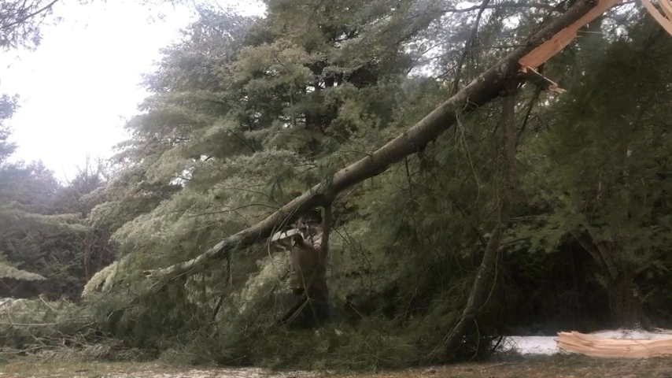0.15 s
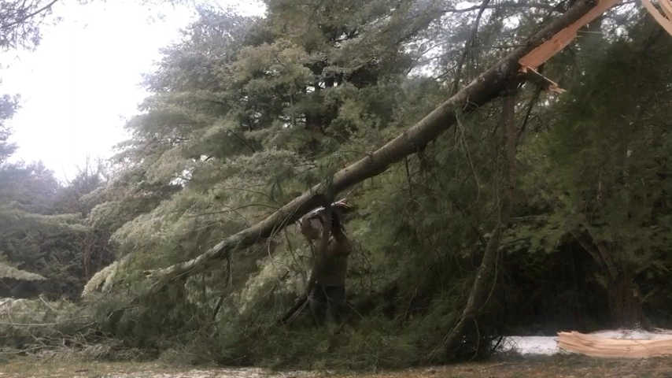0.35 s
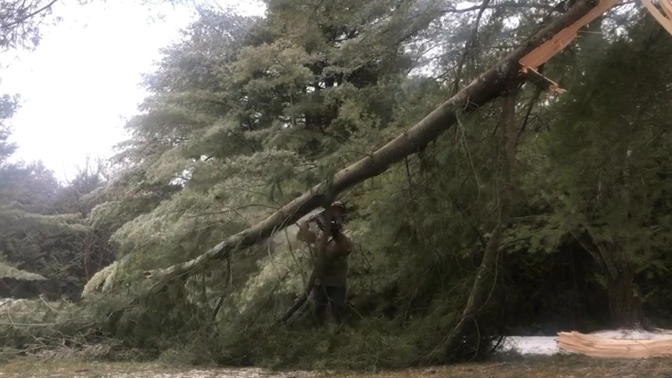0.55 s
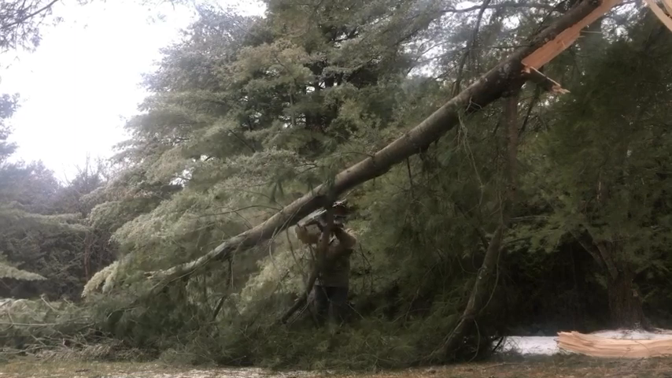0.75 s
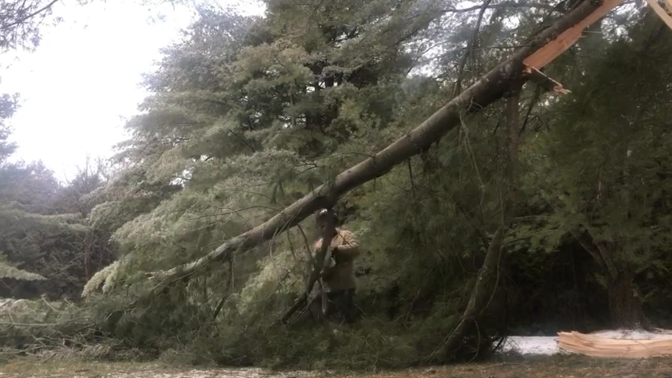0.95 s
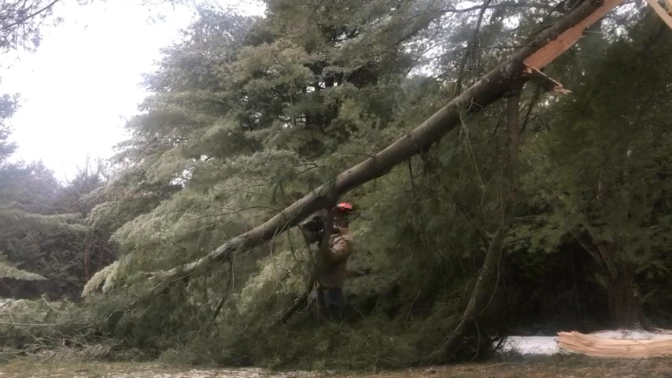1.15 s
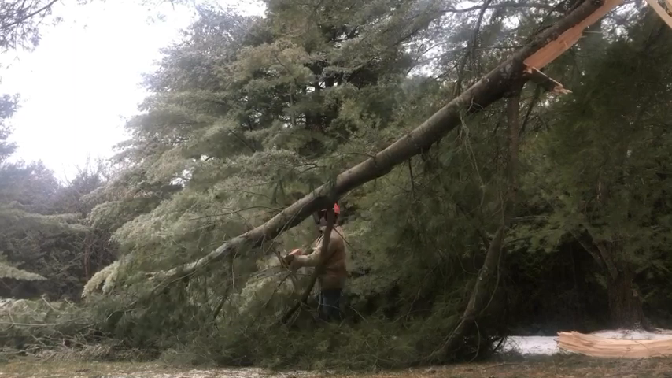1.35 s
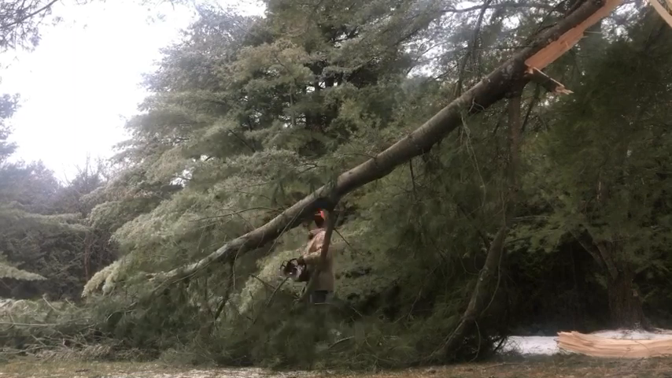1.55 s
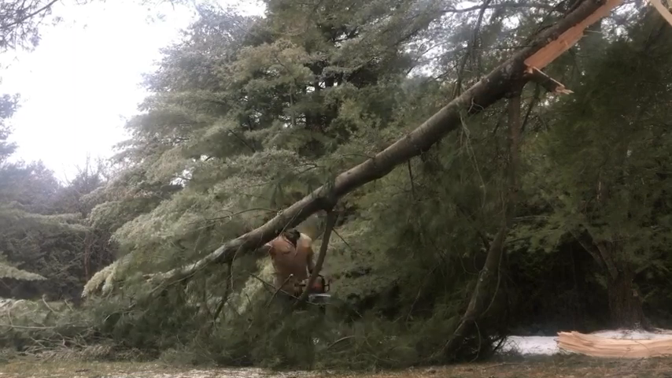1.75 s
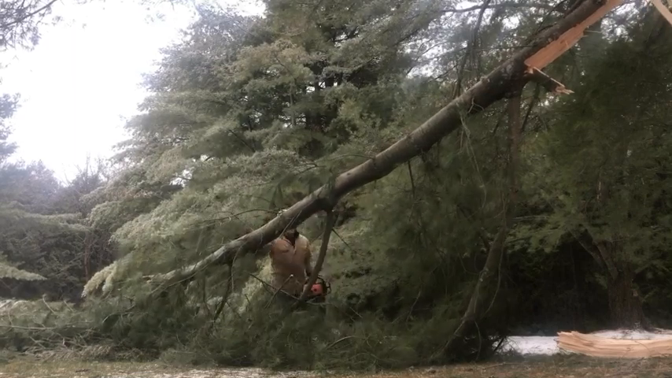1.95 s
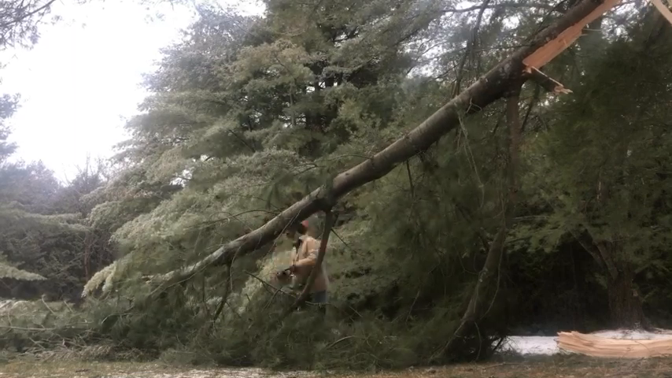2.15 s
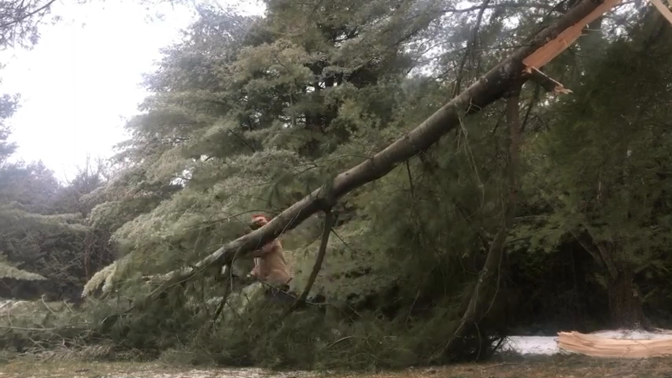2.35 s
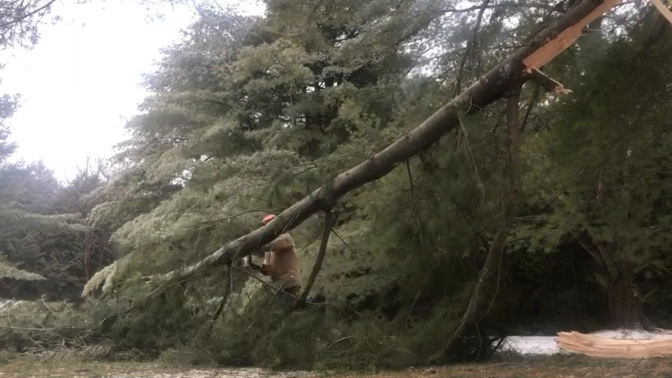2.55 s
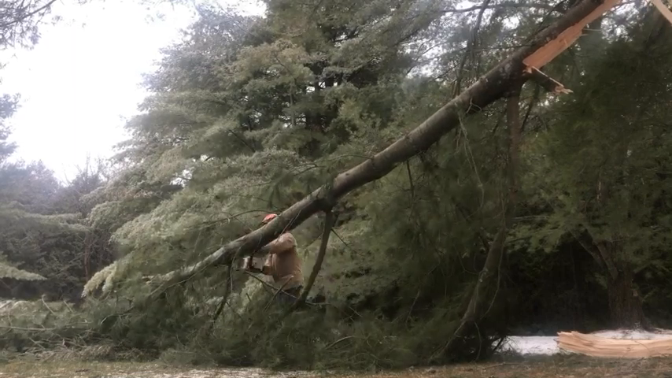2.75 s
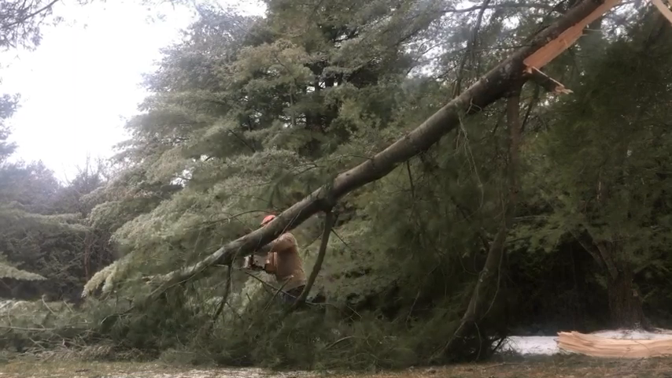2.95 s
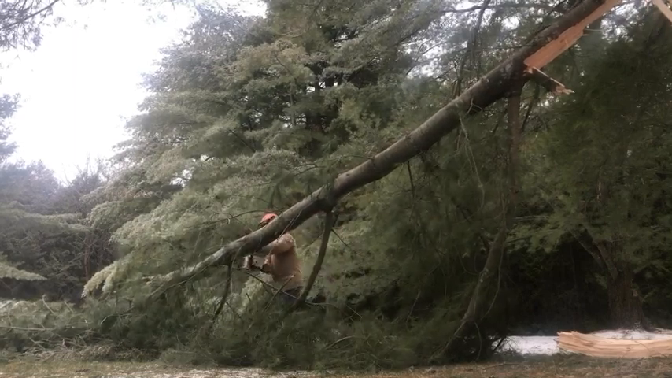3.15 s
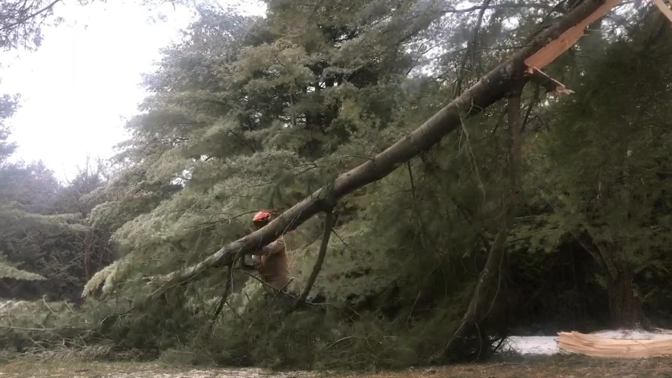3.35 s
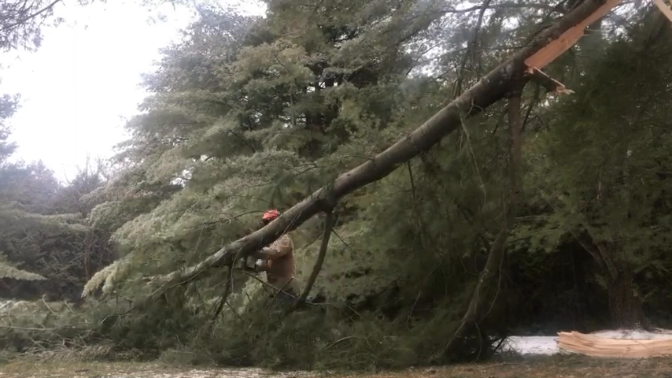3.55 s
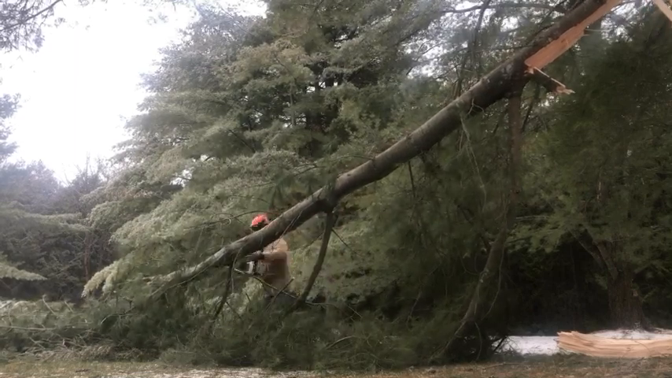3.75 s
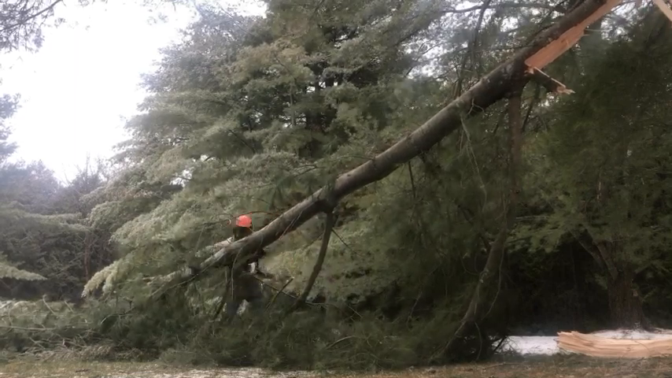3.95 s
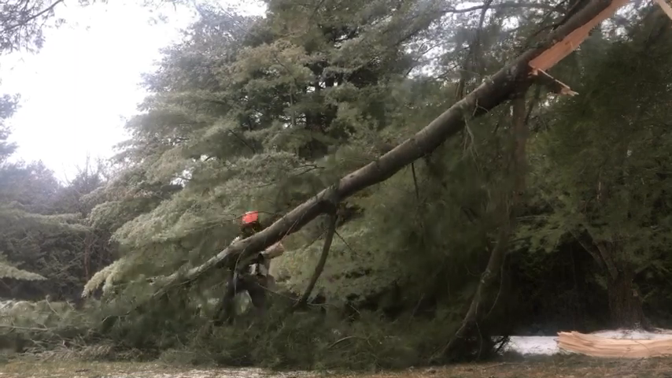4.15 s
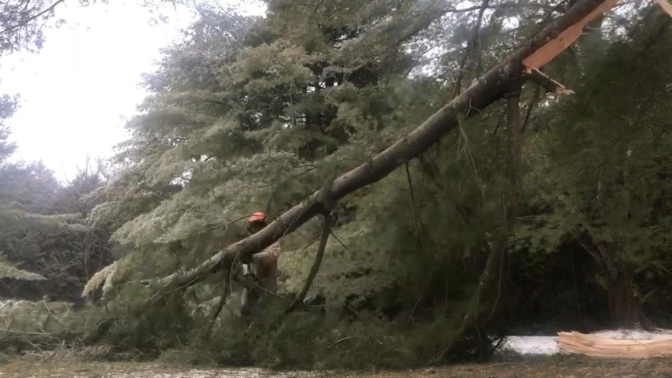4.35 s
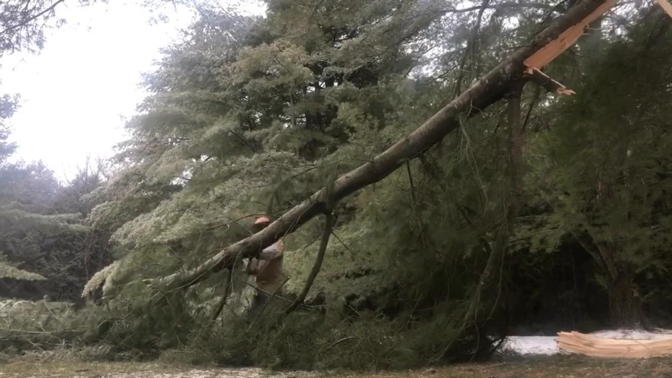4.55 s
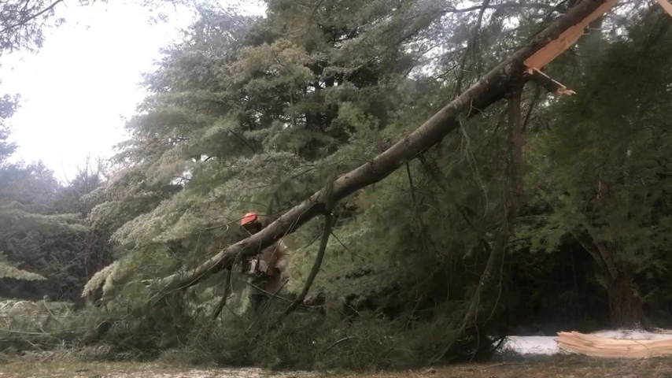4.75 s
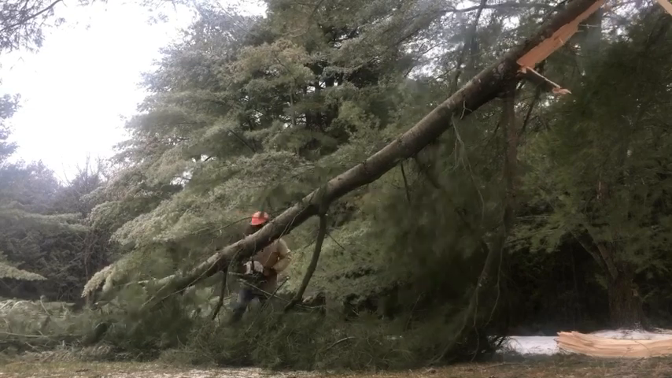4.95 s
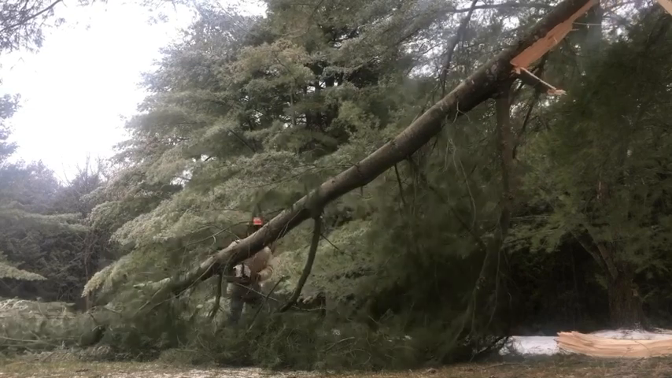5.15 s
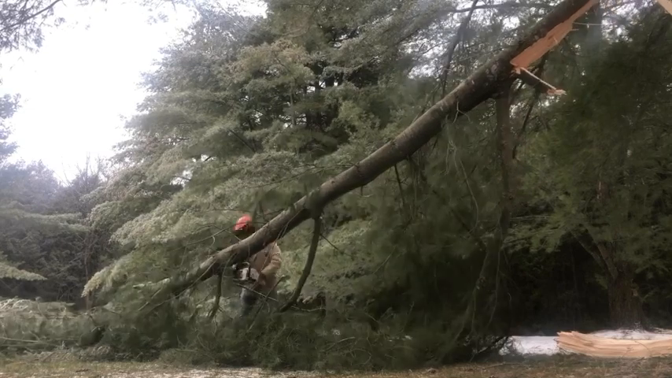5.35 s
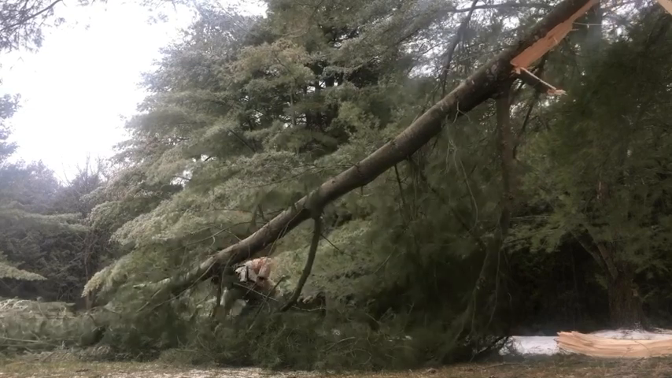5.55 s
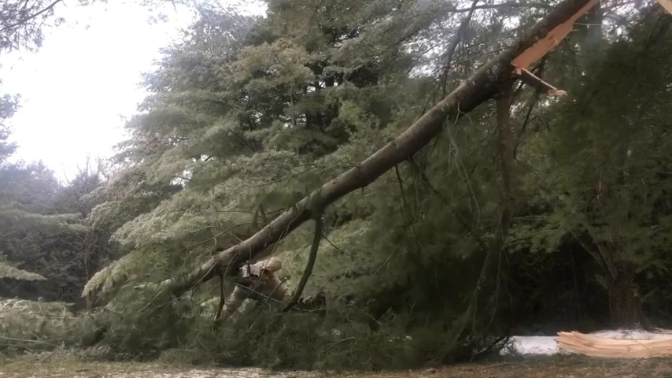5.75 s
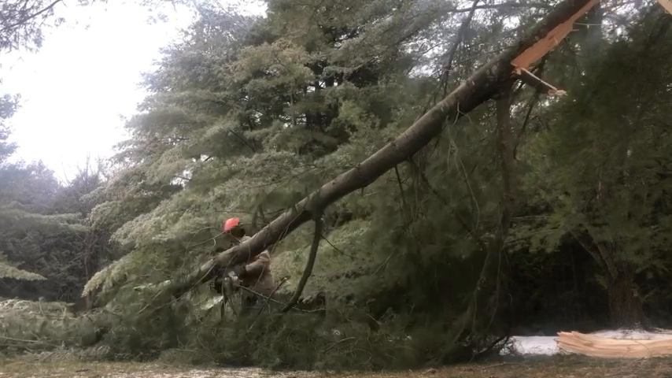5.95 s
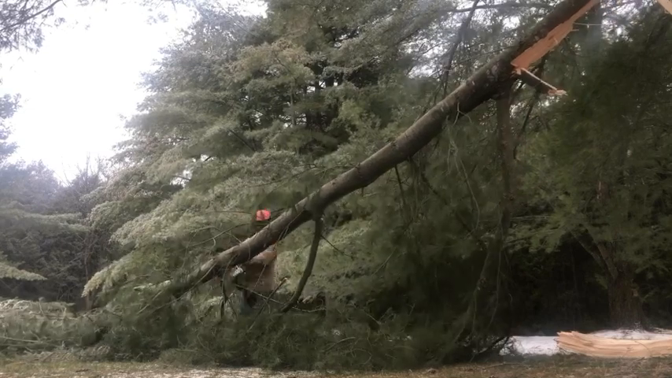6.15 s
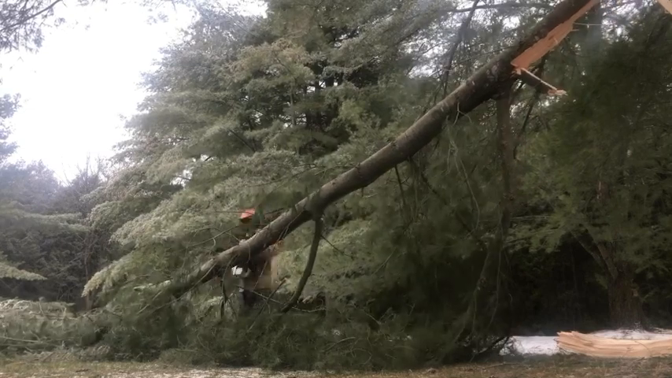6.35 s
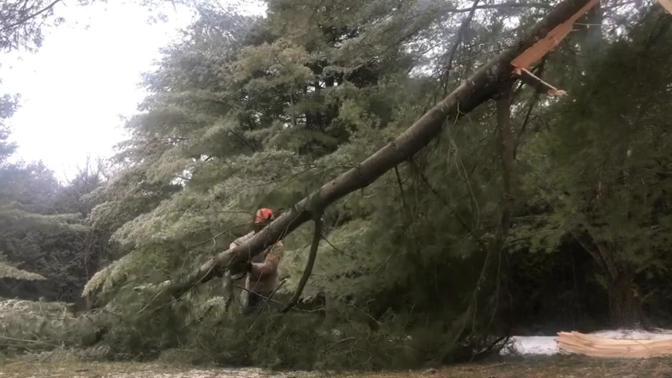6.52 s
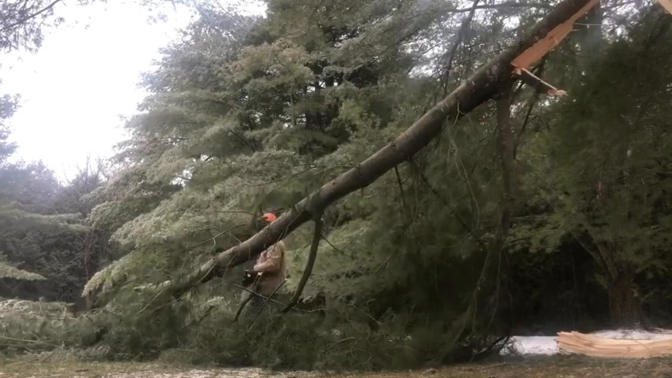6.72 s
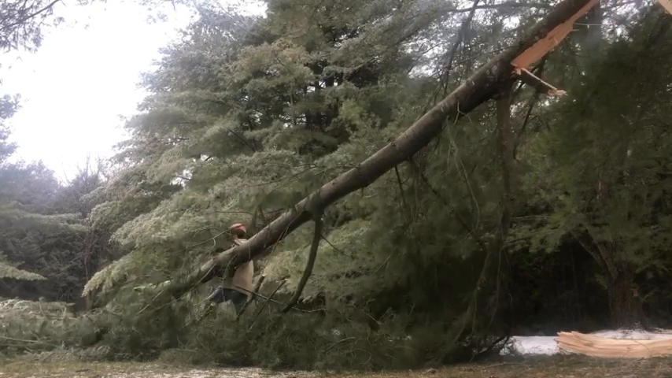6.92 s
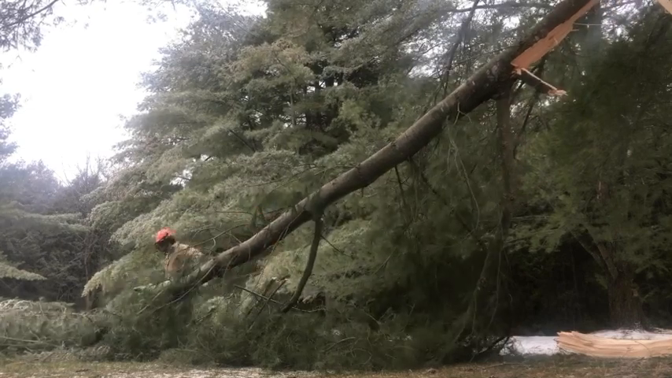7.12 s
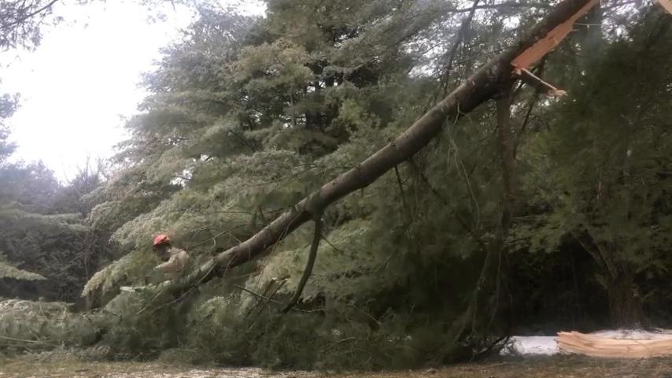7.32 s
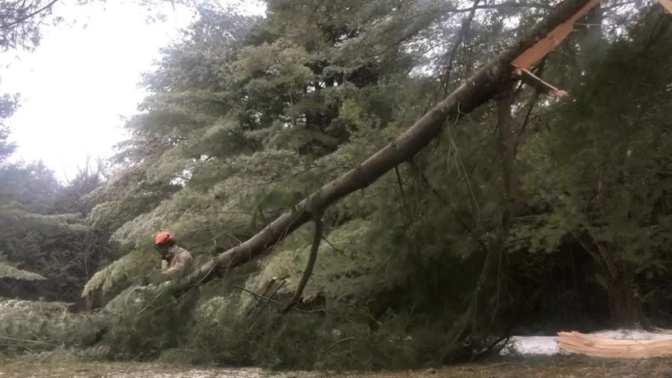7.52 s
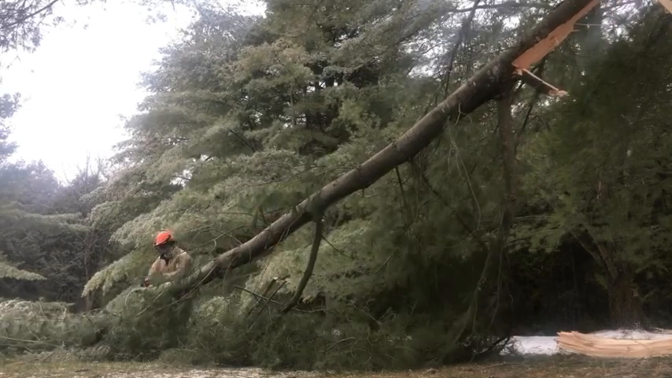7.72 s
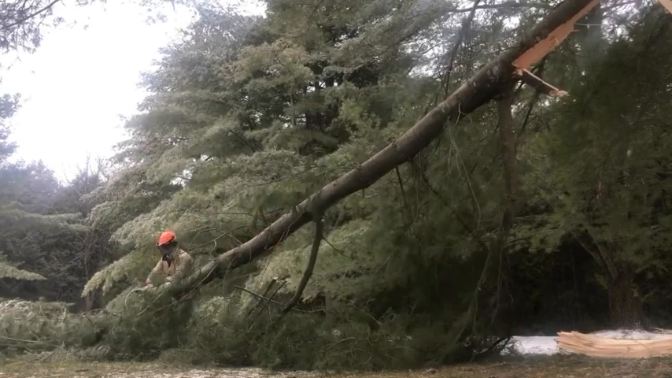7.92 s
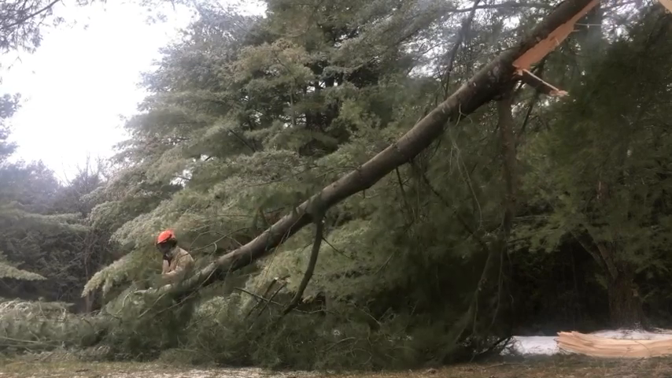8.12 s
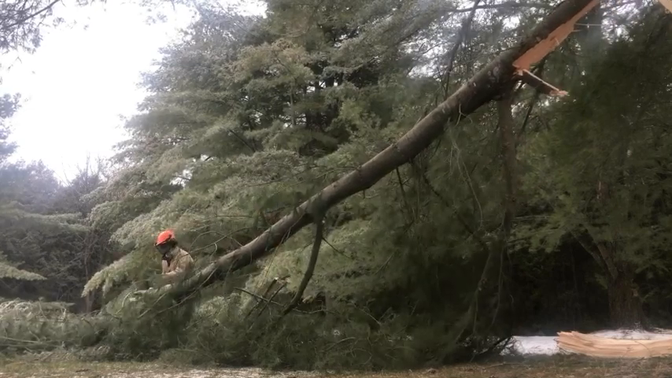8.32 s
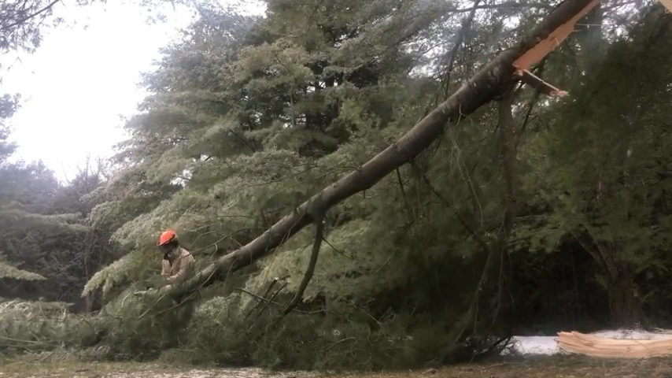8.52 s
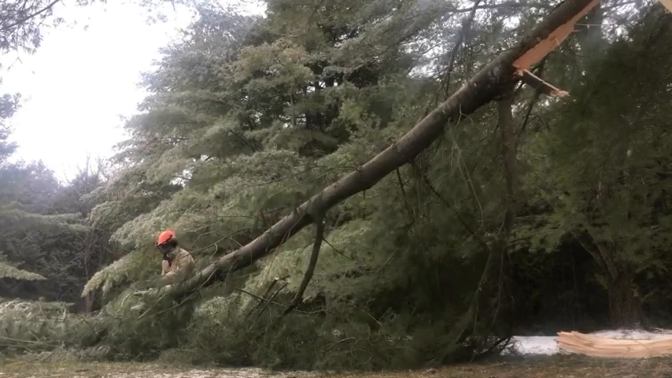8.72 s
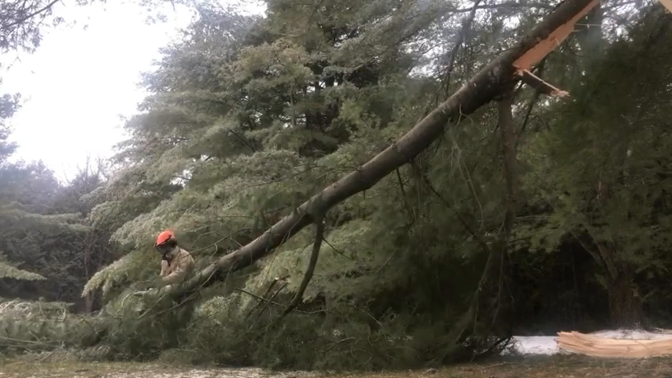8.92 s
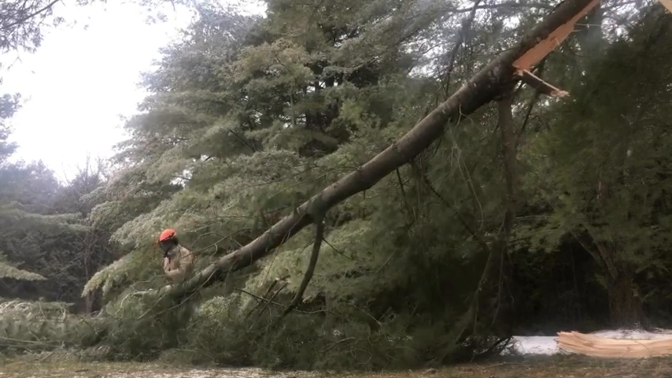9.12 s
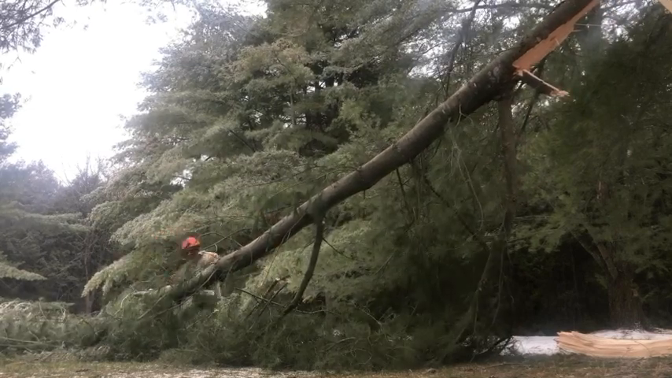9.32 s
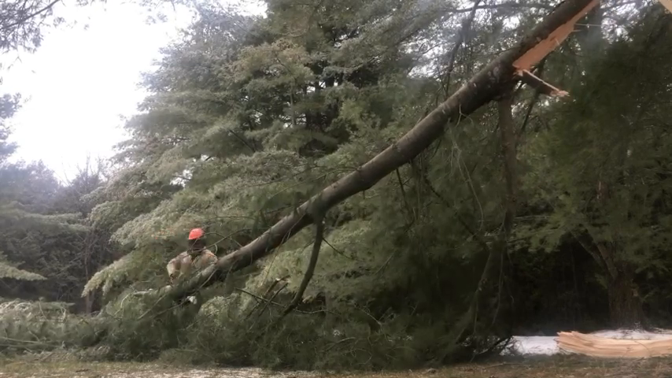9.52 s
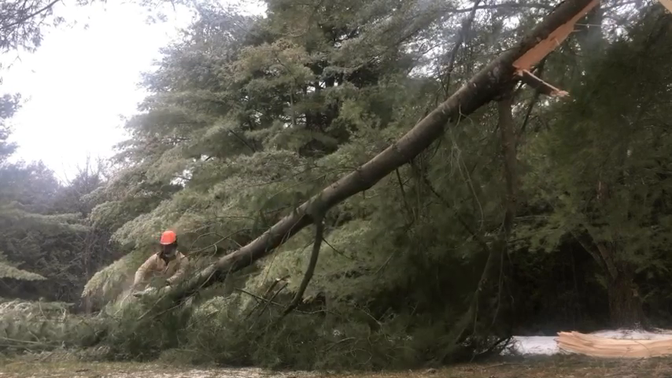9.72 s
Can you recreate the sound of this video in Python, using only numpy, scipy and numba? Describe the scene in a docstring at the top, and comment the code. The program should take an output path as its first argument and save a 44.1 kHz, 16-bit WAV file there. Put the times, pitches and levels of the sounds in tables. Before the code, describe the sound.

Outdoors beside a fallen conifer, a gasoline saw alternates between buzzing full throttle, with hissing chain and torn chips, and a low, dry, ticking idle. Early bursts are bright and harsh; a middle pause of nearly three seconds leaves only uneven putter, chain rattle and occasional clacks. Later bursts are duller, short and rapidly repeated. Trees return a soft echo over faint steady air noise, with the loud peaks slightly overdriving the mono microphone.

```python
"""A two-stroke chainsaw limbs a conifer outdoors: throttle blips, short cuts, rattling idle between.
Each firing thumps the muffler, rings the housing and lets out a puff of gas, built from timed pulses and noise;
under power the running chain hisses and tears chips, at idle it rattles and now and then clacks.
A near reflection combs the treble as the saw is moved; trees return a faint echo over steady glade noise."""
import sys
import numpy as np
from scipy import signal
from scipy.fft import rfft, irfft
from scipy.io import wavfile
from scipy.ndimage import uniform_filter1d, map_coordinates
from numba import njit

SR = 44100
rng = np.random.default_rng(int(sys.argv[2]) if len(sys.argv) > 2 else 0)


def store_pcm(level_fs):
    """Save levels as 16-bit WAV."""
    pcm = np.round(np.clip(level_fs, -1, 1) * 32767).astype(np.int16)
    wavfile.write(sys.argv[1], SR, np.atleast_2d(pcm).T)


N = 431298

# trigger squeezes: [pressed t/s, released t/s, aimed firing rate f/Hz, exhaust trim/dB, rasp trim/dB]
TRIGGER_SQUEEZES = [(0.008, 0.134, 180, -1, -0.5), (0.176, 0.215, 138, -3.5, -0.5),
                    (0.272, 0.303, 160, 1, 0.5), (0.353, 0.845, 208, 1, 0), (1.114, 1.152, 125, -2, 0.5),
                    (1.186, 1.358, 210, -3.5, -0.5), (2.294, 2.322, 117, 4, -1), (2.35, 2.42, 222, 1, 0),
                    (2.516, 2.543, 153, -1, 2), (2.575, 2.726, 217.9, -1, 0),
                    (2.752, 3.364, 215.1, -0.5, 0), (3.466, 3.522, 112, 1, -2.5),
                    (6.238, 6.273, 110, -3, 0.5), (6.325, 6.361, 146, 3, 1), (6.414, 6.447, 158, 2, -1),
                    (6.464, 6.586, 217, -2, -1), (7.449, 7.663, 214, -0.5, -4),
                    (7.726, 7.781, 200, -2.5, -4.5), (7.911, 8.035, 190, -1.5, -4),
                    (8.138, 8.306, 219, -1, -4), (8.372, 8.561, 207, -3, -4.5),
                    (8.643, 9.052, 214, -1, -3.5), (9.483, 9.528, 105, -1.5, -3.5),
                    (9.573, 9.608, 131, 0.5, -0.5), (9.623, 9.799, 203, -1, -4.5)]
# muffler response while picking up: [f/Hz, relative level/dB]
PICKUP_MUFFLER = [(30, -45), (60, -6), (100, 3.5), (170, 5), (300, 2), (480, -2), (650, 5), (830, 0),
                  (1100, -10), (1600, -32), (4000, -53)]
# muffler response at idle: [f/Hz, relative level/dB]
IDLE_MUFFLER = [(30, -31), (70, -16), (130, -15), (220, -7.5), (300, -0.5), (440, 2), (700, -1),
                (1100, -0.5), (1700, -16), (4000, -51)]
# housing response with the chain running: [f/Hz, relative level/dB]
RUNNING_HOUSING = [(80, -63), (600, -4.5), (1650, -13.5), (2100, -5), (2750, -1.5), (3400, 2), (3900, -4.5),
                   (4500, -4), (5700, -6.5), (7800, -5), (9800, -9), (11500, -7), (15500, -9.5)]
# housing response at idle: [f/Hz, relative level/dB]
IDLE_HOUSING = [(800, -9), (1900, -6.5), (2700, 0), (3300, 3), (3800, 2), (4080, 0), (4300, 1.5),
                (5000, -5), (6500, -6), (9000, -8), (10200, -13.5), (11300, -9), (12300, -16), (15500, -16)]


def engine():
    """Trigger to firing rate, throttle opening, share of chain drive, exhaust and rasp levels."""
    # speed set by the wood while the chain bites, one curve per cut: [t/s, firing rate f/Hz]
    cuts = [
        [(0.045, 175.3), (0.111, 206), (0.13, 204.7)],
        [(0.47, 202.6), (0.488, 194.2), (0.526, 221.9), (0.666, 215.3), (0.712, 232.2), (0.806, 211.7),
         (0.84, 217.4)],
        [(1.23, 206.1), (1.278, 208.6), (1.294, 200), (1.304, 200), (1.35, 232.1)],
        [(2.85, 210), (2.87, 221), (2.92, 219.5), (3.04, 217.2), (3.1, 226.5), (3.18, 224.1)],
        [(6.5, 217), (6.528, 227), (6.552, 215.3), (6.585, 228.6)],
        [(7.96, 192.1), (8.03, 218)],
        [(8.69, 213.7), (8.714, 217.2), (8.86, 215.5), (8.884, 201), (8.914, 207.5), (8.928, 198),
         (9.04, 218.7)],
        [(9.67, 203.4), (9.71, 210), (9.72, 211), (9.746, 193), (9.77, 196)],
    ]
    # wandering idle: [t/s, firing rate f/Hz, rattle level/dB, exhaust level/dB]
    idle = [(1.1, 43.98, -37, -38), (1.75, 43.56, -40, -39.5), (2.25, 42, -37, -41),
            (3.65, 37.94, -37, -41.5), (3.95, 39.2, -34.5, -38.5), (4.05, 43.5, -33, -38.5),
            (4.42, 49, -33, -37), (4.57, 39.1, -39.5, -37), (4.7, 39, -34.5, -41), (5.2, 38.4, -35, -37.5),
            (5.6, 45.1, -31, -39), (5.7, 35.33, -37, -44.5), (5.92, 39.5, -33.5, -38.5),
            (6.2, 39.08, -37.5, -41), (6.8, 41.1, -32.5, -36.5), (7.1, 43.02, -39, -41),
            (9.4, 43.02, -38.5, -40)]
    # nominal loudness: [firing rate f/Hz, exhaust coasting level/dB, exhaust powered level/dB, rasp level/dB]
    loudness = [(57, -40, -22, -29.5), (89, -31, -24.5, -25), (113, -32, -23, -22.5), (167, -28, -20, -16),
                (216, -25.5, -15.5, -14.5)]
    # teeth grab, engine bogs: [t/s, drop in aimed firing rate f/Hz, half-length to 1/e t/s]
    bogs = [(.447, 26.02, .014), (2.674, 33.93, .014), (2.795, 46.1, .038), (3.198, 45.98, .017),
            (3.338, 67.73, .042), (7.642, 42.14, .026)]
    climb_hz_per_s, kick_hz = 2450., 91.7  # the first full charge throws the crank towards kick_hz
    settle_s, throttle_s = .005, .022  # meeting the load; throttle opening or shutting
    coast_s, pinched_coast_s = .068, .023  # time constants of the run-down
    pinch_start_s, pinch_end_s = 3.36, 3.6  # the kerf pinches the chain
    clutch_hz = 22  # this far above idle the chain is fully driven

    t = np.arange(N) / SR
    squeezes = np.array(TRIGGER_SQUEEZES)
    latest = np.maximum(np.searchsorted(squeezes[:, 0], t) - 1, 0)
    start, end, aim_hz, exhaust_trim_db, rasp_trim_db = squeezes[latest].T
    pressed = (t >= start) & (t < end)
    for cut in cuts:
        s, cut_hz = np.transpose(cut)
        cutting = (t >= s[0]) & (start < s[0])
        aim_hz = np.where(cutting, np.interp(t + settle_s, s, cut_hz), aim_hz)
    for s, lost_hz, half_s in bogs:
        aim_hz = aim_hz - lost_hz * np.exp(-np.minimum(((t + settle_s - s) / half_s) ** 2, 20))

    idle_hz, rattle_db, mutter_db = curves(idle)
    pinched = (t > pinch_start_s) & (t < pinch_end_s)
    run_down_s = np.where(pinched, pinched_coast_s, coast_s)
    hz = flywheel(pressed, aim_hz, idle_hz, climb_hz_per_s, settle_s, run_down_s, kick_hz)
    throttle = np.clip(smooth(1. * pressed, throttle_s), 0, 1)
    driven = np.clip((hz - idle_hz) / clutch_hz, 0, 1)

    speeds_hz, *levels = np.transpose(loudness)
    coasting_db, power_db, running_db = (np.interp(hz, speeds_hz, db) for db in levels)
    off_throttle_db = fade(mutter_db, coasting_db, driven)
    exhaust_db = fade(off_throttle_db, power_db + smooth(exhaust_trim_db, throttle_s), throttle)
    rasp_db = fade(rattle_db, running_db + smooth(rasp_trim_db, throttle_s), driven)
    return hz, throttle, driven, exhaust_db, rasp_db


@njit
def flywheel(pressed, aim, idle, climb, settle, coast, kick):
    """Firing rate: kick and capped climb to the aim while pressed, exponential run-down to idle after."""
    hz, now = np.empty(len(aim)), 2 * idle[0]
    for i in range(len(aim)):
        if pressed[i]:
            now += min(max(climb, (kick - now) / settle), (aim[i] - now) / settle) / SR
        else:
            now += (idle[i] - now) / coast[i] / SR
        hz[i] = now
    return hz


def firings(hz):
    """Jittered sample position of every firing, and its unsteadiness (.04 at full speed, 1 at idle)."""
    turns = np.cumsum(hz) / SR
    at = np.interp(np.arange(1, turns[-1]), turns, np.arange(N))
    rate_hz = hz[at.astype(int)]
    unsteady = np.interp(rate_hz, [45, 125, 165, 200], [1, .5, .13, .04])
    jitter = .018 * unsteady * rng.standard_normal(len(at)) * SR / rate_hz
    return at + jitter, unsteady


def scatter(unsteady, least_db, most_db):
    """Random strength of each firing, spreading wider as it burns less steadily."""
    spread_db = least_db + unsteady * (most_db - least_db)
    return undb(spread_db * np.clip(rng.standard_normal(len(unsteady)), -2, 2))


def exhaust(at, unsteady, hz, throttle):
    """Muffler pulses and turbulent gas: ragged bark picking up, clean note flat out, mutter off throttle."""
    # muffler response at full speed: [f/Hz, relative level/dB]
    full_speed_muffler = [(30, -51), (60, -16), (110, -3), (215, 8), (330, -1), (440, 4.5), (660, -6.5),
                          (880, 0), (1080, -27.5), (1320, -11.5), (1700, -25.5), (2400, -25), (5000, -44)]
    size = scatter(unsteady, least_db=.5, most_db=2.0)
    pulses = baffles(steady(clicks(at, -size)))
    gas = steady(noise() * puffs(at, size, rise_s=.0015, fall_s=.007))

    flat_out = steady(colour(pulses + undb(-17.5) * gas, full_speed_muffler))
    bark_gas_db = np.interp(hz, [90, 150], [-1, -8])
    barking = steady(colour(pulses + undb(bark_gas_db) * gas, PICKUP_MUFFLER))
    mutter = steady(colour(gas + undb(2.0) * noise(), IDLE_MUFFLER))
    mutter_db = np.interp(hz, [45, 90], [-2, -7])
    coasting = steady(pumping(hz) + undb(mutter_db) * mutter)

    loaded = blend(barking, flat_out, (hz - 135) / 48)
    return steady(blend(coasting, loaded, throttle))


def baffles(x):
    """Muffler chambers delay sound near their resonances; all-pass, so levels stay."""
    for hz, width_hz in [(600, 260), (900, 260), (1400, 400), (2100, 600)]:
        x = x - 2 * band(x, hz, width_hz)
    return x


def pumping(hz):
    """Piston pumping air: harmonics that follow the crank speed, coloured by the muffler's cavity."""
    # piston harmonics: [multiple of crank speed, level/dB]
    harmonics = [(1, 6.5), (2, 1), (3, -6), (4, -5), (5, 2), (6, -18), (7, -5.5), (9, -5.5), (11, -7)]
    # cavity response: [f/Hz, relative level/dB]
    cavity = [(35, -40), (65, -17), (85, -14.5), (105, -6), (150, -2), (210, 2), (280, -4.5), (450, 4.5),
              (1000, -22.5)]
    phase = 2 * np.pi * np.cumsum(hz) / SR
    tone = np.zeros(N)
    for multiple, db in harmonics:
        tone += undb(db) * np.cos(multiple * phase + rng.uniform(0, 2 * np.pi))
    return steady(colour(tone, cavity))


def rasp(at, unsteady, hz, throttle):
    """Powered: port edges ring the housing amid gas hiss and chips; idle: loose parts rattle once a turn."""
    size = scatter(unsteady, least_db=.5, most_db=2.8)
    edge = multipath(clicks(at, size), spread_s=.0035)
    edge = signal.sosfilt(signal.butter(2, 4000, fs=SR, output="sos"), edge)
    gas = steady(noise() * puffs(at, size, rise_s=.0035, fall_s=.025))
    chips = steady(noise() * (rng.random(N) < 2500 / SR))  # 2500 grains per s on average
    hiss = steady(gas + undb(-8) * chips)
    running = colour(hiss + undb(-6 + 7.8 * throttle) * edge, RUNNING_HOUSING)

    # each turn drags the slack chain forward in a soft stroke
    drag_at = at + .002 * SR * unsteady * rng.standard_normal(len(at))
    stroke_size = scatter(unsteady, least_db=1, most_db=2.2)
    strokes = puffs(drag_at, stroke_size, rise_s=.005, fall_s=.005)
    strokes = uniform_filter1d(strokes, size=350)
    # drifting chain whirr fills the gaps
    whirr = undb(-.5 + 2 * walk(size=9000)) * noise()
    rattle = steady(colour(steady(noise() * strokes) + whirr, IDLE_HOUSING))

    direct = steady(ring(blend(rattle, running, (hz - 55) / 75)))
    return direct + .25 * multipath(direct, spread_s=.001)


def ring(x):
    """Bar and cooling fins add narrow steel resonances to whatever shakes them."""
    # bar and fin modes: [f/Hz, width f/Hz, level before common gain/dB]
    modes = [(2077, 21, -4), (2692, 19, -0.5), (2826, 12.3, -6), (3490, 11, 2), (3600, 15, -3),
             (3846, 23, 3.5), (4270, 18, 4), (5300, 26, -10)]
    return x + undb(.5) * sum(undb(db) * band(x, hz, width_hz) for hz, width_hz, db in modes)


def multipath(x, spread_s, count=4):
    """Short paths round saw and branches smear each pulse; their strengths drift at random."""
    decay = np.exp(-np.arange(1024) / SR / spread_s)
    paths = rng.standard_normal((count, len(decay))) * decay / np.linalg.norm(decay)
    return steady(sum(walk(size=6000) * signal.oaconvolve(x, path)[:N] for path in paths))


def catches(hz):
    """First full charge of a squeeze from low speed: a noise burst through muffler and housing."""
    below_hz, burst_db = 160, -12  # burst_db before rasp trim and colouring
    s, _, _, _, rasp_trim_db = np.transpose(TRIGGER_SQUEEZES)
    slow = hz[(s * SR).astype(int)] < below_hz
    size = slow * undb(burst_db + rasp_trim_db)
    burst = noise() * puffs((s + .006) * SR, size, rise_s=.005, fall_s=.018)
    return undb(-11) * colour(burst, PICKUP_MUFFLER) + undb(-11) * colour(burst, RUNNING_HOUSING)


def clacks():
    """Slack chain and clutch clack at idle: decaying noise as bright tick, steel rattle and dull knock."""
    # slaps on the bar: [t/s, strike level before colouring/dB]
    slaps = [(1.6035, -23), (2.134, -25), (2.203, -24), (3.6706, -25.5), (3.8821, -29), (3.9525, -28),
             (4.6773, -25), (5.0418, -29), (5.1161, -24), (5.3727, -27), (5.8099, -21.5), (5.892, -38),
             (5.9593, -24.5), (6.9955, -29)]
    s, strike_db = np.transpose(slaps)
    slap = noise() * puffs(s * SR, undb(strike_db), rise_s=.001, fall_s=.0039)
    steel = undb(.5) * colour(slap, IDLE_HOUSING)
    knock = undb(-7.5) * colour(slap, IDLE_MUFFLER)
    tick = undb(-18) * slap
    return steel + knock + tick


def held(x, driven):
    """Radiation varies with the saw's height; a height-dependent near reflection combs the treble."""
    # how the saw is held: [t/s, height/m, treble level above 6 kHz/dB]
    hold = [(0, 1.73, 1.5), (.45, 2.17, 4.5), (.85, 2.09, 3.5), (1.37, 1.904, 2.5), (1.9, 0.91, -1.5),
            (2.4, 1.18, -1), (2.9, 1.51, 4), (3.3, 1.328, 2), (4.3, 1.14, 0.5), (6.1, 1.14, 0),
            (6.5, 1.27, 2), (7.1, 1.01, -4.5), (7.6, 1.03, -0.5), (8.9, 0.99, -1.5), (9.78, 1.0, -1.5)]
    # low, chest, overhead: [height/m, reflection strength 0-1]
    poses = [(1.0, 0.28), (1.5, 0.16), (2.05, 0.24)]
    # radiation in those poses: [f/Hz, width f/Hz, low level/dB, chest level/dB, overhead level/dB]
    lobes = [(420, 98.4, 0.5, -3, 0.5), (690, 210, 2.5, -1.5, 5.5), (890, 180, 0, 0.5, 2),
             (1400, 250, -0.5, 6, -1.5), (1940, 940, -1, -4.5, 7), (5200, 1000, -1.5, -3.5, 7.5)]
    lag_ms_per_m = .196  # higher saw, later reflection
    height_m, treble_db = curves(hold)
    pose_m, strength = np.transpose(poses)

    body = signal.sosfiltfilt(signal.butter(2, 6000, fs=SR, output="sos"), x)
    x = body + undb(treble_db) * (x - body)
    x = x + sum((undb(np.interp(height_m, pose_m, db)) - 1) * band(x, hz, width_hz)
                for hz, width_hz, *db in lobes)
    hollow_db = 5 * (driven - .5)  # a dip at idle, a lift with the chain driven
    x = x + (undb(hollow_db) - 1) * band(x, 1230, 600)

    late = np.arange(N) - lag_ms_per_m * height_m * SR / 1000
    # a small, rough surface returns little bass or highest treble
    returned = signal.sosfiltfilt(signal.butter(1, [800, 12000], "band", fs=SR, output="sos"), x)
    reflection = map_coordinates(returned, [late], order=3)
    return steady(x + np.interp(height_m, pose_m, strength) * reflection)


def trees(x, t60_s, wet_db, onset_s):
    """Diffuse, dull echo from trunks and foliage: decaying noise tail, low-passed."""
    t = np.arange(SR) / SR
    tail = rng.standard_normal(SR) * np.exp(-np.log(1000) * t / t60_s) * (1 - np.exp(-t / onset_s))
    echo = signal.fftconvolve(x, tail / np.linalg.norm(tail))[:N]
    return undb(wet_db) * signal.sosfilt(signal.butter(1, 3500, fs=SR, output="sos"), echo)


def glade():
    """Quiet outdoor background: steady coloured noise."""
    # background spectrum: [f/Hz, relative level/dB]
    spectrum = [(25, -4), (90, -6), (250, 8.5), (1000, -16.5), (4000, -21), (15000, -40)]
    return undb(-42) * colour(noise(), spectrum)


def undb(db):
    """Decibels to gain."""
    return 10 ** (np.asarray(db) / 20)


def curves(table):
    """Columns of a (t/s, values) table, linearly interpolated to every sample."""
    s, *columns = np.transpose(table)
    return [np.interp(np.arange(N) / SR, s, column) for column in columns]


def noise():
    """White noise, unit variance."""
    return rng.standard_normal(N)


def walk(size):
    """Slow random drift of about unit spread: levels held for size samples, slewed twice."""
    held_levels = np.repeat(rng.standard_normal(N // size + 1), size)
    return 1.3 * uniform_filter1d(uniform_filter1d(held_levels, size), size)[:N]


def steady(x, size=2205):
    """Bring the running rms to about 1 over size samples; faster detail keeps its shape."""
    power = uniform_filter1d(uniform_filter1d(x * x, size), size // 2)
    return x / np.sqrt(np.abs(power) + 1e-12)


def smooth(x, span_s):
    """Running mean over span_s."""
    return uniform_filter1d(x, max(int(span_s * SR), 1))


def fade(a, b, share):
    """Linear fade from a to b."""
    return a + share * (b - a)


def blend(a, b, share):
    """Equal-power fade from a to b."""
    share = np.clip(share, 0, 1)
    return np.sqrt(1 - share) * a + np.sqrt(share) * b


def band(x, hz, width_hz):
    """One resonance, gain 1 at its centre."""
    return signal.lfilter(*signal.iirpeak(hz, hz / width_hz, fs=SR), x)


def colour(x, points):
    """Minimum-phase filter with the (f/Hz, level/dB) outline and unit energy."""
    hz, db = np.transpose(points)
    f = np.maximum(np.fft.rfftfreq(4096, 1 / SR), 1)
    cepstrum = irfft(np.log(undb(np.interp(np.log(f), np.log(hz), db))))
    half = len(cepstrum) // 2
    causal = 2 * cepstrum[:half] * (np.arange(half) > 0)  # folded: minimum phase
    response = irfft(np.exp(rfft(causal, 2 * half)))[:half]
    return signal.fftconvolve(x, response / np.linalg.norm(response))[:N]


def clicks(at, size):
    """Band-limited impulses at fractional sample positions (windowed sinc)."""
    taps = np.floor(at).astype(int)[:, None] + np.arange(-7, 9)
    offset = taps - at[:, None]
    shape = np.sinc(offset) * np.sinc(offset / 8)
    return np.bincount(np.clip(taps, 0, N - 1).ravel(), (shape * size[:, None]).ravel(), N)


def puffs(at, size, rise_s, fall_s):
    """Envelope that swells and dies away after every event."""
    t = np.arange(SR // 10) / SR
    swell = (1 - np.exp(-t / rise_s)) * np.exp(-t / fall_s)
    return signal.fftconvolve(clicks(at, size), swell)[:N]


def scene():
    """Saw, tree echo and glade, the same in both channels."""
    hz, throttle, driven, exhaust_db, rasp_db = engine()
    exhaust_db = exhaust_db + .92 * walk(size=2400)  # slight random swell
    at, unsteady = firings(hz)
    saw = undb(exhaust_db - 1.47) * held(exhaust(at, unsteady, hz, throttle), driven)
    saw = saw + undb(rasp_db - .56) * held(rasp(at, unsteady, hz, throttle), driven)
    saw = saw + clacks() + catches(hz)
    echo = trees(saw, t60_s=.5, wet_db=-20, onset_s=.022)
    mono = saw + echo + glade()
    return np.array([mono, mono])


def record(dry):
    """Microphone loses the deepest bass; the input clips at full scale, then a steep low-pass cuts the top."""
    top_hz = 15750
    heard = signal.sosfilt(signal.butter(2, 48, "high", fs=SR, output="sos"), dry)
    clipped = np.clip(heard, -1, 1)
    return signal.sosfilt(signal.ellip(10, .2, 80, top_hz, fs=SR, output="sos"), clipped)


dry = scene()
out = record(dry)
store_pcm(out)
```